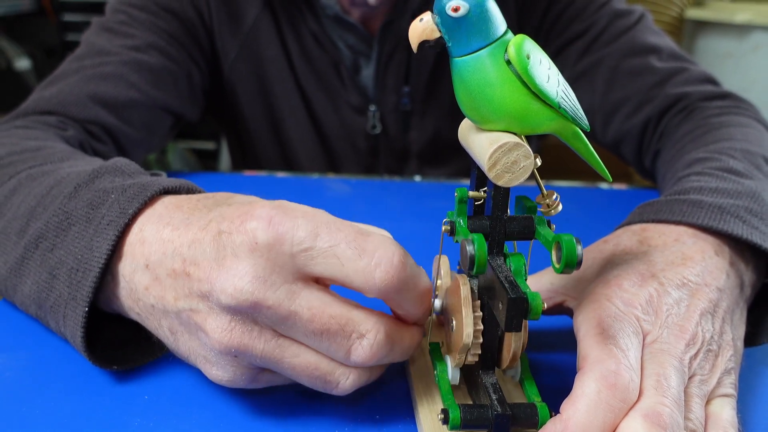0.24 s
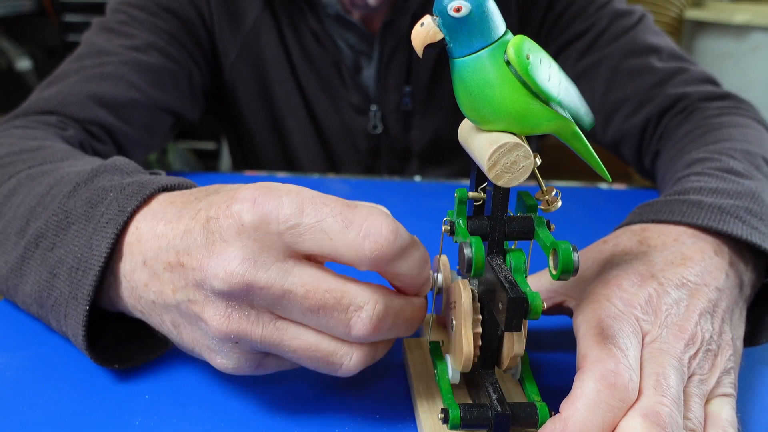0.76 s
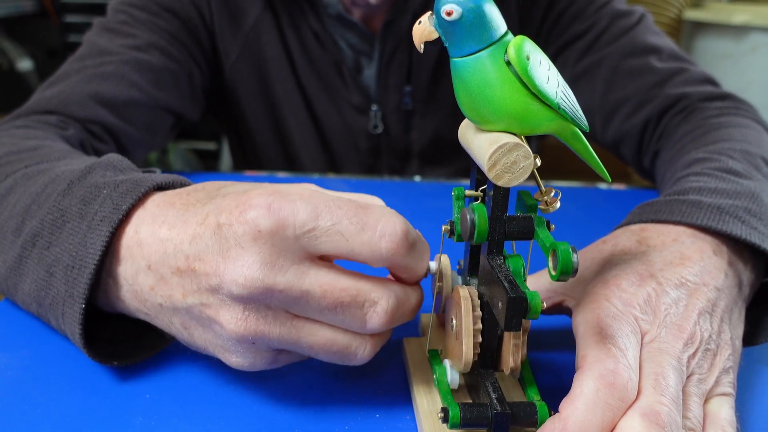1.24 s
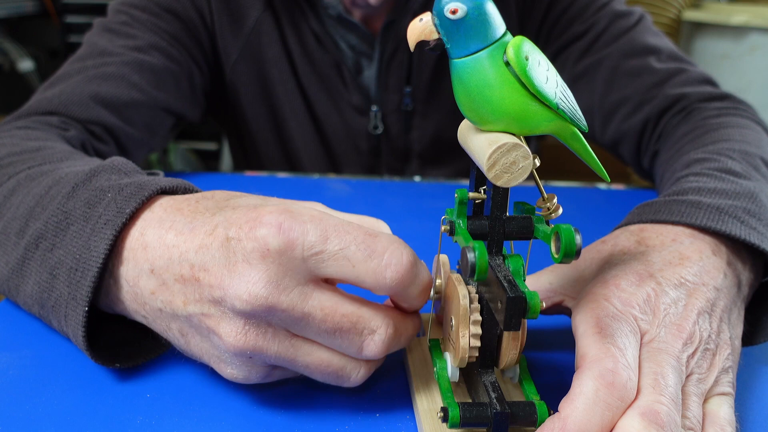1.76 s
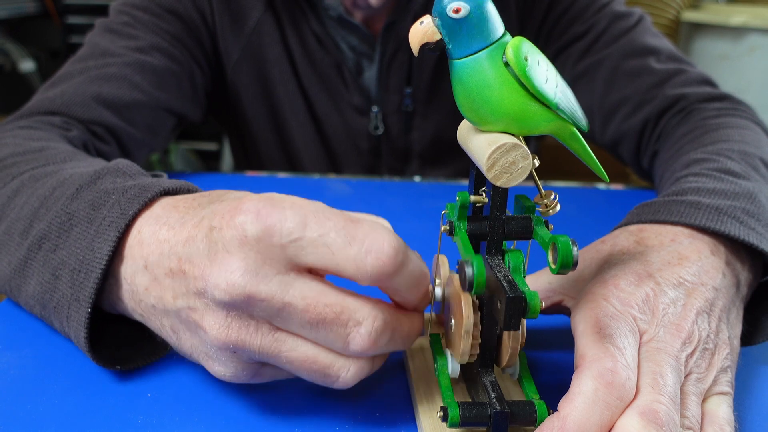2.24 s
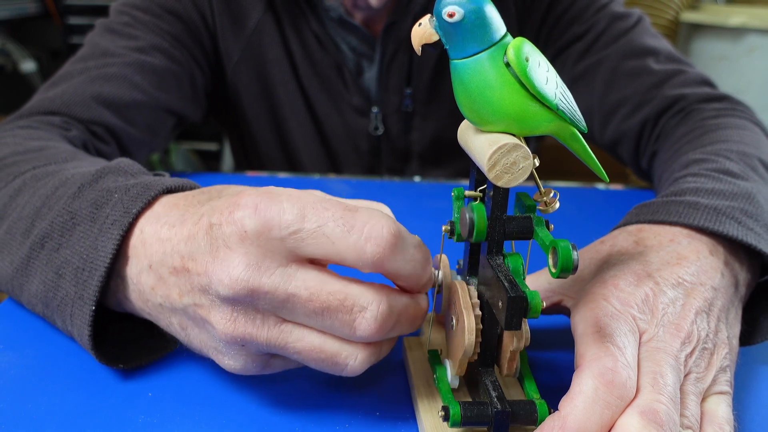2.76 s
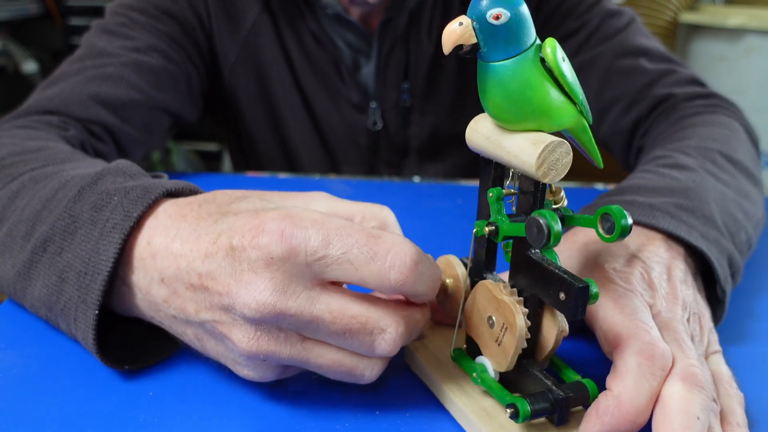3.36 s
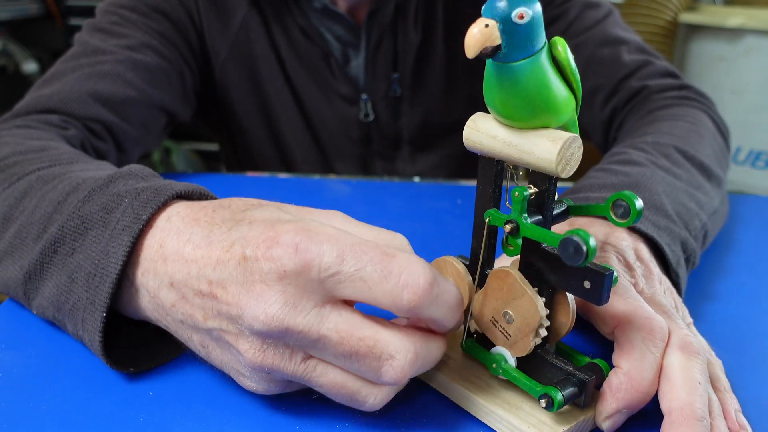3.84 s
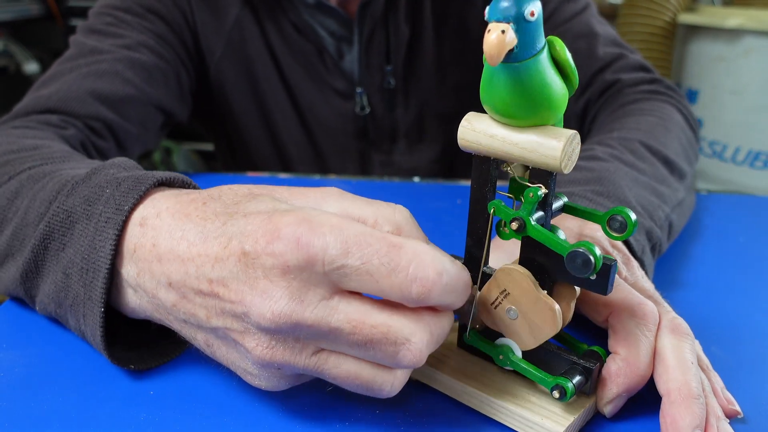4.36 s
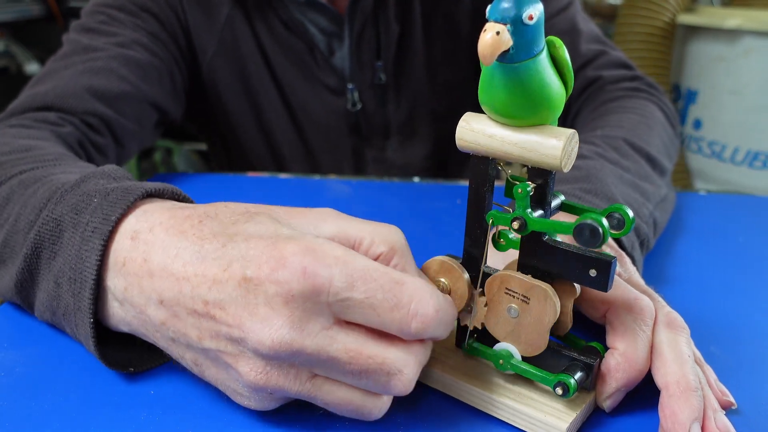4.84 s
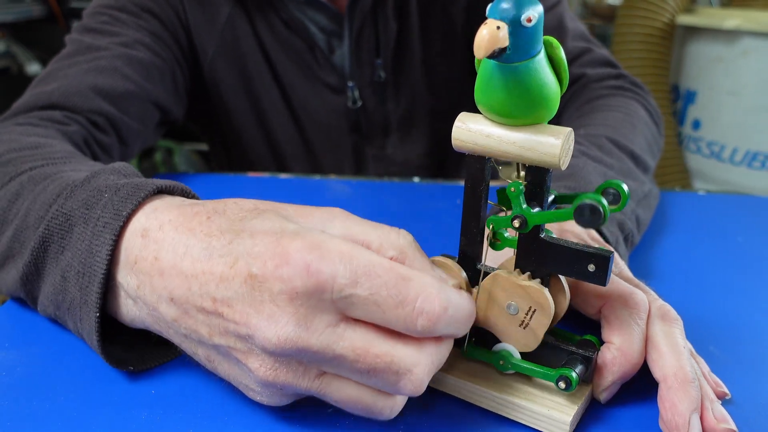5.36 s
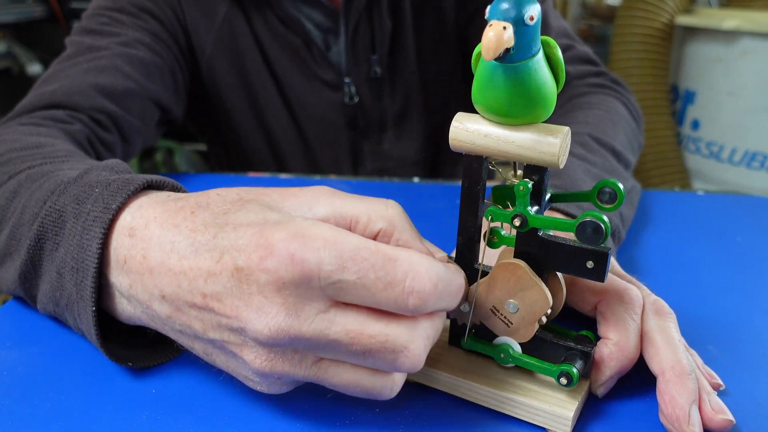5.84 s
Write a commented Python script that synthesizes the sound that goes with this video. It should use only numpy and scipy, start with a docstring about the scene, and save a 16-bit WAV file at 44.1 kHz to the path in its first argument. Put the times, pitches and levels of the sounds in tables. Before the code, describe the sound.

A small wooden mechanism is hand-cranked on a table, clicking, ticking and rubbing in uneven clusters, with two wooden knocks midway.

```python
"""A small wooden automaton clicks and rubs as a hand cranks it on a table, close to one microphone.
Gear teeth, cam followers, levers and wire links click: short bursts of force ring the modes of each part.
Between clicks they rub in tiny slips, which shake the base board and the table top; links and wires rustle.
The board bumps softly, twice it knocks down on the table as fading tones, and thin steel rods sing on.
A workshop room answers, over a steady low rumble with faint hiss and a dull wash made of filtered noise."""
import sys
import numpy as np
from scipy import signal
from scipy.fft import rfft, irfft, next_fast_len
from scipy.io import wavfile
from scipy.ndimage import uniform_filter1d, map_coordinates

SR = 44100
rng = np.random.default_rng(int(sys.argv[2]) if len(sys.argv) > 2 else 0)


def wav_record(signal):
    """Record a signal, one row per channel, as 16-bit PCM in the file named by sys.argv[1]."""
    frames = np.transpose(np.atleast_2d(signal))
    bounded = np.clip(frames, -1, 1)
    # unit amplitude maps onto the largest positive 16-bit level
    quanta = np.round(bounded * 32767).astype(np.int16)
    wavfile.write(sys.argv[1], SR, quanta)


N = 268657  # length in samples


def amp(db):
    """Turn dB into a plain factor."""
    return 10 ** (np.asarray(db) / 20)


def unit(x):
    """Scale a sound to an rms of 1."""
    return x / np.sqrt(np.mean(x ** 2) + 1e-20)


def along(points, hz):
    """Read a curve of (Hz, value) points on a log frequency axis."""
    f, value = np.transpose(points)
    return np.interp(np.log(hz + 1), np.log(f + 1), value)


def over_time(points):
    """Read a curve of (seconds, value) points at every sample."""
    return np.interp(np.arange(N) / SR, *np.transpose(points))


def wobble(rate):
    """Draw a smooth random curve with this many knots a second."""
    knots = rng.standard_normal(int(N * rate / SR) + 4)
    return map_coordinates(knots, [np.arange(N) * rate / SR])


def filtered(x, response):
    """Multiply the spectrum of x by a response of frequency."""
    size = next_fast_len(N + SR // 2)
    spectrum = rfft(x, size) * response(np.fft.rfftfreq(size, 1 / SR))
    return irfft(spectrum, size)[..., :N]


def modes(rows, f):
    """Give one causal resonance per row (centre Hz, width Hz, dB), with alternating signs."""
    return np.array([(-1) ** k * amp(db) * 1j * f * width / (centre * centre - f * f + 1j * f * width)
                     for k, (centre, width, db) in enumerate(rows)])


def span(rows, f):
    """A part radiates little far below or above its modes."""
    low, high = 0.83 * rows[0][0], 1.172 * rows[-1][0]
    return modes([(np.sqrt(low * high), high - low, 0)], f)[0] ** 2


def body(rows, f, struck):
    """The ring of a part whose modes are struck with the given strengths."""
    return span(rows, f) * (struck @ modes(rows, f))


def rubbed(rows, per_second, spread_db, smooth, damping=1):
    """Tiny unequal slips over an even scrape ring a part; lasting contact damps and widens its modes; rms 1."""
    size_db = spread_db * np.minimum(rng.exponential(size=N), 4)
    slips = (rng.random(N) < per_second / SR) * amp(size_db) * rng.standard_normal(N)
    damped = np.array(rows) * [1, damping, 1]
    colour = lambda f: span(rows, f) * np.linalg.norm(modes(damped, f), axis=0)
    return unit(filtered(unit(slips) + smooth * rng.standard_normal(N), colour))


# The clearest contacts. Each row: time of the peak in seconds, wood level in dB, strongest wood ring in Hz,
# steel level in dB, strongest steel ring in Hz, wires level in dB. Levels are before sharing and scatter.
CONTACTS = [(0.0726, -41, 4290, -38, 9910, -38), (0.084, -35, 3790, -33, 9390, -45),
            (0.088, -34, 4050, -26, 8000, -32), (0.1137, -42, 3600, -41, 7900, -29),
            (0.1249, -28, 4170, -45, 8250, -53), (0.144, -24.5, 4970, -32, 6250, -47),
            (0.257, -35, 4220, -44, 7620, -62), (0.276, -44, 4330, -25.5, 7900, -42),
            (0.2858, -25.5, 4200, -43, 6870, -57), (0.2934, -37, 4120, -40, 10550, -39),
            (0.321, -24, 4100, -36.5, 6760, -47), (0.3306, -31.5, 3770, -32.5, 8350, -46),
            (0.407, -28, 3000, -43, 9320, -42), (0.452, -21.5, 2730, -30, 7960, -44),
            (0.4562, -26.5, 2840, -34, 7880, -44), (0.5087, -41, 2390, -39, 9500, -22),
            (0.513, -20, 5000, -24, 9000, -39), (0.5155, -24, 5060, -16, 6600, -46),
            (0.5363, -12.5, 2740, -8.5, 7060, -20), (0.5436, -22, 5080, -35, 6930, -37),
            (0.555, -24, 5920, -25, 6070, -47), (0.5585, -12, 5170, -10.5, 8600, -32.5),
            (0.5715, -39, 1230, -28, 8510, -45), (0.613, -40, 5190, -39, 7690, -63),
            (0.7219, -27.5, 3750, -26.5, 8440, -30.5), (0.757, -31.5, 3060, -47, 8380, -52),
            (0.7624, -35, 4610, -50, 8100, -54), (0.7921, -27.5, 4110, -36, 6570, -27.5),
            (0.807, -46, 4240, -41, 9800, -32), (0.8605, -35, 4440, -37, 8290, -50),
            (0.8854, -28.5, 4220, -32, 8570, -51), (0.903, -10.5, 3085, -9.5, 7300, -19),
            (0.935, -25.5, 3960, -26.5, 8200, -28), (0.9783, -16, 5040, -16.5, 7580, -38),
            (1.007, -25, 4020, -21, 6500, -50), (1.1169, -43, 4110, -43, 8400, -63),
            (1.132, -38.5, 4100, -52, 7820, -60), (1.142, -39.5, 2500, -38, 9320, -30),
            (1.177, -32, 3850, -37, 6870, -46), (1.18, -34, 1330, -32, 9300, -34),
            (1.2097, -30.5, 4260, -49, 7690, -64), (1.2293, -41, 2700, -40, 8700, -55),
            (1.2677, -32.5, 4130, -55, 8330, -71), (1.319, -38.5, 4110, -40, 6220, -65),
            (1.3814, -37.5, 5120, -51, 6100, -44), (1.399, -36, 4440, -38, 9410, -35),
            (1.422, -33, 4070, -41, 6070, -38), (1.4365, -45, 4030, -38, 9800, -32),
            (1.456, -30, 2350, -39, 9750, -21), (1.46, -35, 4220, -29, 9930, -23),
            (1.4642, -20.5, 4230, -23.5, 6500, -26), (1.491, -29, 4770, -32, 9350, -24.5),
            (1.522, -42, 4180, -40, 9020, -42), (1.536, -38, 4310, -52, 8310, -47),
            (1.7905, -37, 3940, -53, 6630, -52), (1.824, -36.5, 3570, -51, 9390, -51),
            (1.8542, -35.5, 4050, -41, 8250, -50), (1.9129, -33, 5200, -58, 7580, -63),
            (1.9455, -36, 1290, -52, 6780, -57), (1.95, -34.5, 2500, -38, 8180, -39),
            (2.121, -45, 4160, -43, 7770, -40), (2.1646, -25.5, 3740, -24, 10290, -31),
            (2.2024, -14.5, 4560, -21, 8130, -25), (2.2442, -22.5, 3120, -34, 8200, -38),
            (2.259, -25, 2800, -49, 8140, -51), (2.2652, -29, 2940, -49, 7820, -60),
            (2.345, -37, 1490, -38.5, 9350, -29), (2.3548, -25.5, 3100, -41, 7060, -51),
            (2.358, -20, 3900, -21, 6720, -46), (2.38, -13.5, 3200, -9.5, 7250, -20),
            (2.407, -16.5, 3750, -13, 8400, -12.5), (2.4173, -32, 3680, -14, 8600, -32),
            (2.4292, -47, 3380, -20, 8440, -42), (2.4975, -25, 3850, -31, 8360, -32),
            (2.5308, -26, 4870, -42, 7920, -43), (2.5519, -24, 4130, -39, 6980, -33.5),
            (2.5569, -25.5, 3090, -36, 8180, -49), (2.6047, -26, 2870, -52, 6040, -56),
            (2.627, -27, 4400, -24, 8250, -33), (2.6392, -21.5, 3950, -25, 8250, -33),
            (2.653, -10, 2920, -5.5, 7490, -16), (2.659, -20, 3830, -28, 6850, -41),
            (2.662, -13.5, 4200, -17, 9150, -36), (2.678, -22, 2650, -20, 7140, -27),
            (2.737, -21, 3980, -31, 6570, -58), (2.7697, -23, 4000, -28, 6780, -55),
            (2.8234, -22.5, 5200, -23, 10300, -28), (2.828, -32, 2950, -25.5, 8350, -33),
            (2.8558, -30, 3800, -35, 8810, -51), (2.957, -33, 4040, -54, 6910, -63),
            (2.99, -36, 3960, -41, 7840, -61), (3.0033, -31.5, 4220, -48, 8530, -66),
            (3.016, -26, 5380, -30, 8000, -35.5), (3.0427, -33.5, 4110, -51, 6740, -64),
            (3.15, -33.5, 2800, -36, 9990, -34), (3.1746, -34, 4890, -30, 6700, -42),
            (3.1799, -13.5, 5190, -23, 7670, -33), (3.213, -31.5, 1720, -45, 9860, -30),
            (3.27, -19, 4950, -27, 6700, -42), (3.356, -31, 1340, -45, 7430, -58),
            (3.5393, -47, 4310, -35, 8630, -57), (3.6151, -48, 3880, -36, 8530, -47),
            (3.6275, -32, 4200, -44, 8740, -52), (3.671, -39.5, 2690, -37.5, 8970, -54),
            (3.7458, -28.5, 4030, -38, 8310, -43), (3.802, -18, 4930, -29, 8160, -52),
            (3.932, -32, 4310, -26, 9060, -49), (3.937, -21.5, 4330, -47, 7210, -58),
            (3.9712, -32, 4240, -54, 7620, -62), (4.007, -29, 3930, -42, 9470, -36),
            (4.022, -24, 4250, -40, 9240, -52), (4.026, -31, 2390, -25, 8460, -47),
            (4.092, -19, 2970, -27, 8440, -35), (4.1375, -20.5, 2730, -21, 9350, -35),
            (4.154, -25.5, 2650, -27, 9990, -48), (4.2334, -14.5, 2675, -26, 7320, -45),
            (4.2368, -24, 2520, -26, 7100, -53), (4.27, -22, 2280, -26, 7750, -32),
            (4.2742, -21, 2890, -29, 8510, -47), (4.2897, -20, 2750, -21, 8300, -29),
            (4.3131, -19, 4590, -18, 7940, -42), (4.3178, -19, 3750, -30, 8290, -46),
            (4.3225, -18.5, 4310, -22, 7860, -40), (4.33, -26, 4160, -25, 6740, -52),
            (4.34, -29, 3940, -30.5, 7620, -47), (4.3466, -11, 3900, -23, 7080, -49),
            (4.412, -34, 1300, -34, 9240, -39), (4.4354, -26.5, 2630, -20.5, 9200, -32),
            (4.441, -25, 2840, -39, 8120, -46), (4.454, -26, 2760, -30.5, 9880, -42),
            (4.4997, -36, 4330, -49, 6980, -32.5), (4.8341, -22, 4260, -23.5, 8500, -36),
            (4.8522, -22, 2570, -29, 9000, -43), (4.857, -7.5, 4800, -6, 7300, -18),
            (4.864, -18, 5750, -35, 7730, -35), (4.8757, -24, 4220, -27, 6800, -33),
            (4.8857, -24, 2650, -31, 6910, -46), (4.923, -32, 4950, -36, 6680, -60),
            (4.9291, -11, 5030, -13, 6760, -37), (4.9518, -32, 4330, -38, 7040, -61),
            (4.9628, -27, 4160, -32, 7080, -57), (4.987, -27, 5430, -34, 7130, -49),
            (5.094, -33.5, 5300, -54, 6880, -54), (5.1027, -40.5, 1255, -34, 8750, -42),
            (5.1296, -35, 4130, -52, 7350, -61), (5.2334, -30.5, 4030, -32.5, 6240, -62),
            (5.2712, -32, 4600, -37, 8720, -32), (5.2756, -36, 2260, -31, 10080, -30),
            (5.3138, -21, 4310, -22, 6980, -27), (5.3364, -32, 4260, -26, 9990, -30.5),
            (5.361, -15.5, 4180, -25, 7190, -32), (5.3786, -31, 5710, -35, 10190, -28),
            (5.417, -33, 3770, -34, 8230, -42), (5.5077, -26.5, 5760, -25.5, 8520, -39),
            (5.512, -32, 4300, -47, 9020, -48), (5.5145, -30, 4440, -44, 8040, -58),
            (5.619, -31, 3570, -38, 6800, -52), (5.6653, -23, 4280, -32, 7580, -58),
            (5.7065, -29.5, 4180, -35.5, 9990, -34), (5.75, -27.5, 4330, -33, 7950, -40),
            (5.755, -14, 4200, -16.5, 7150, -43), (5.761, -40, 4500, -31, 10420, -25),
            (5.767, -26, 3920, -28, 6960, -41), (5.7717, -26, 4350, -32.5, 6070, -46),
            (5.8565, -31, 4900, -40, 6960, -63), (5.8815, -28, 4370, -36, 9040, -50),
            (5.8902, -21.5, 4350, -22, 6980, -51), (5.919, -40, 4290, -43, 7840, -58),
            (5.965, -31, 3760, -46, 8270, -46), (5.9846, -21.5, 4000, -30, 6980, -55),
            (5.988, -30, 4330, -30.5, 7900, -38), (6.0419, -8, 5350, -30, 7300, -16.5),
            (6.073, -25, 3010, -50, 10720, -47), (6.0784, -23.5, 2560, -19.5, 10000, -37)]
# The rings of board, levers, cams, pin, links and wires, one list for each part.
# Each row: frequency in Hz, width in Hz before damping, relative level in dB.
PART_MODES = [
    [(797, 610, 0.5), (1353, 200, 3), (1959, 280, 7.5)],
    [(2233, 410, -4), (2586, 450, 1.5), (2858, 450, 3), (3218, 360, -1.5)],
    [(3775, 450, -2.5), (4126, 450, 0), (5036, 230, -3), (5510, 550, -8)],
    [(6570, 600, -7), (7130, 320, -1.5)],
    [(7797, 350, 2), (8605, 420, 1.5), (9150, 660, -0.5), (10150, 810, -2)],
    [(11400, 990, -6), (12870, 830, -28), (13130, 1700, 2), (14230, 450, 2.5), (15740, 880, 6)],
]
# The frequencies in Hz that divide board, levers, cams, pin and links.
PART_BORDERS_HZ = [2150, 3500, 6000, 7500]
# How a blow on wood is shared. One row for each struck part, board, lever or cam;
# the columns are the dB that board, levers and cams each get.
WOOD_SHARES_DB = [(4, -0.5, -7.5), (-5.5, 1, -6.5), (-8, -7, 1.5)]
# The same for steel: one row for each struck part, pin or link; the columns are the dB for pin and links.
STEEL_SHARES_DB = [(1, -10.5), (-11, 0.5)]
# How many times wider the touching parts make each other's modes (a factor): board, levers, cams, pin, links, wires.
TOUCH_DAMPING = [1.1, 1.3, 1.5, 1.01, 1.2, 1.01]
CONTACT_MS, CONTACT_SCATTER = 1.6, 0.2365  # typical contact length, and its random spread (log scale)
SHARE_SCATTER_DB = 1
BOARD_LAGS, USUAL_DB = 0.27, -26.5  # the board loses this many dB per dB of blow over the usual


def clicks():
    """Each contact is a short rattle of force; the struck parts hand the blow on to their neighbours."""
    s, wood, wood_hz, steel, steel_hz, wires = np.vstack([CONTACTS, ticks()]).T
    count, size = len(s), 1024
    t, f = np.arange(size) / SR, np.fft.rfftfreq(size, 1 / SR)

    # noise that swells and fades within the contact
    length_s = CONTACT_MS / 1000 * np.exp(CONTACT_SCATTER * rng.standard_normal((count, 1)))
    u = 3.2 * t / np.clip(length_s, 3e-4, 0.005)
    force = rfft(u ** 1.6 * np.exp(-u) * rng.standard_normal((count, size)))

    struck_wood = np.searchsorted(PART_BORDERS_HZ[:2], wood_hz)
    wooden = wood[:, None] + np.array(WOOD_SHARES_DB)[struck_wood]
    wooden -= BOARD_LAGS * np.outer(wood - USUAL_DB, [1, 0, 0])
    struck_steel = np.searchsorted(PART_BORDERS_HZ[-1:], steel_hz)
    steely = steel[:, None] + np.array(STEEL_SHARES_DB)[struck_steel]
    levels = np.c_[wooden, steely, wires]
    levels = levels + SHARE_SCATTER_DB * rng.standard_normal((count, len(PART_MODES)))

    sound = np.zeros((count, size))
    for part, damping, db in zip(PART_MODES, TOUCH_DAMPING, levels.T):
        # each blow lands at another spot and favours the modes next to its strongest rings
        mode_hz = np.array(part)[:, 0]
        near = sum(np.exp(-(np.log(mode_hz / hz[:, None]) / 0.076) ** 2) for hz in (wood_hz, steel_hz))
        struck = amp(2.5 * rng.standard_normal((count, len(part))) + 6.3 * near)
        ring = irfft(force * body(np.array(part) * [1, damping, 1], f, struck), size)
        sound += amp(db)[:, None] * ring / np.abs(ring).max(axis=1, keepdims=True)

    # put the loudest millisecond of each click at its listed time
    peak = uniform_filter1d(sound ** 2, size=44).argmax(axis=1)
    where = (np.round(s * SR).astype(int) - peak)[:, None] + np.arange(size)
    return np.bincount(np.maximum(where, 0).ravel(), sound.ravel(), N + size)[:N]


TICKS_PER_S = 10
TICK_DB, TICK_SCATTER_DB = 9, 2  # wood level over the gears' scrape, and its spread
TICK_STEEL_DB, TICK_WIRES_DB = -8.5, -14  # relative to the tick's wood level


def ticks():
    """Small chance contacts, laid out like CONTACTS, grow and shrink with the gears' scrape."""
    count = int(N / SR * 40)
    draw, known = rng.random((count, 3)), np.array(CONTACTS)
    s = 0.02 + draw[:, 0] * (N / SR - 0.05)
    scrape_db = np.interp(s, *np.transpose(CRANK_RUB)[::2])
    wood = scrape_db + TICK_DB + TICK_SCATTER_DB * rng.standard_normal(count)
    spot = known[(draw[:, 1] * len(known)).astype(int)]  # borrow the rings of a listed contact
    rows = np.c_[s, wood, spot[:, 2], wood + TICK_STEEL_DB, spot[:, 4], wood + TICK_WIRES_DB]
    return rows[draw[:, 2] < TICKS_PER_S * N / SR / count]


# Rubbing under the crank, before the random jolts.
# Each row: time in seconds, shaking of the board in dB, scrape of the gears in dB.
CRANK_RUB = [(0, -49, -53), (.1, -38, -42.5), (.22, -53.5, -60), (.29, -34.5, -40.5), (.39, -51.5, -47),
             (.46, -44.5, -47), (.52, -44.5, -38), (.56, -36, -40), (.66, -49.5, -50.5), (.98, -42, -41.5),
             (1.08, -58.5, -55.5), (1.15, -43, -46), (1.37, -56.5, -67), (1.46, -31.5, -32.5),
             (1.56, -54, -62.5), (1.66, -40.5, -43.5), (1.71, -59, -64), (1.8, -32, -43.5),
             (1.9, -45.5, -49), (1.95, -35, -47.5), (2.03, -59.5, -63.5), (2.19, -36, -39),
             (2.31, -45, -46.5), (2.41, -35, -33), (2.58, -44.5, -49), (2.68, -37.5, -39.5),
             (2.78, -42, -41), (2.98, -47, -55.5), (3.07, -43.5, -44), (3.14, -46, -44),
             (3.19, -35.5, -44.5), (3.335, -49, -44), (3.36, -37, -46), (3.48, -52, -54), (3.61, -38, -44),
             (3.86, -41.5, -46.5), (3.9, -56, -63), (3.95, -34, -42.5), (4.05, -44.5, -47.5),
             (4.24, -44.5, -43.5), (4.32, -32, -35), (4.57, -53.5, -59), (4.63, -42.5, -41.5),
             (4.67, -55, -77), (4.82, -51, -52), (4.865, -30, -29), (5.02, -49, -49), (5.26, -48, -45.5),
             (5.33, -35, -37.5), (5.46, -52, -51), (5.51, -34.5, -43), (5.59, -51.5, -51), (5.63, -39, -41),
             (5.68, -44, -45.5), (5.77, -37, -33), (5.83, -51, -51.5), (5.89, -39, -34), (6.09, -42, -55)]
# Arms and crank shake the table top. Each row: time in seconds, level in dB.
TABLE_LEAN = [(0, -47.5), (.56, -42.5), (.68, -54.5), (.9, -43), (1.61, -48), (1.93, -40), (2.17, -46.5),
              (2.53, -43), (2.59, -34), (3.07, -46), (3.14, -39), (3.26, -49), (3.335, -42), (3.355, -28.5),
              (3.46, -32), (3.53, -38), (3.81, -45), (4.36, -39), (4.56, -56), (4.82, -43), (4.94, -32.5),
              (5.31, -48), (5.5, -40.5), (5.6, -35), (6.09, -35.5)]
# The wires rub faintly. Each row: time in seconds, level in dB before the jolts.
WIRE_RUB = [(0, -64), (.25, -81), (1.3, -73), (1.7, -66), (2.6, -72.5), (2.98, -77), (3.35, -67),
            (3.9, -77), (4.2, -64), (4.75, -81), (5.1, -65), (6.09, -91)]
# How much of the gears' scrape, in dB, goes to board, levers, cams, pin and links.
SCRAPE_SHARES_DB = [-9.5, -11.5, -9.5, -21.5, -15]
# Modes of the table top. Each row: frequency in Hz, width in Hz, relative level in dB.
TABLE_MODES = [(30, 5.3, -0.5), (44.6, 9.4, 2.5), (95.5, 21, -10)]
# Low bending of the base board. Each row: frequency in Hz, width in Hz, relative level in dB.
BOARD_LOW_MODES = [(125.5, 29, -2), (144.4, 39, -3), (194, 126, 6)]
# Higher modes of the base board. Each row: frequency in Hz, width in Hz, relative level in dB.
BOARD_HIGH_MODES = [(238, 110, -5), (305.5, 13.7, 3.5), (339.5, 20, 4), (434, 36, -14), (535, 51, -7),
                    (610.4, 49, -3.5), (755, 28, -6)]
BENDING_DB = -48  # middle level of the low bending
BENDING_FOLLOWS, BENDING_LEANS = 0.38, 0.33  # dB per dB of shaking, and of leaning


def crank():
    """Teeth and cams scrape in uneven slips, each part in its own; the jolts reach the board and the scrape."""
    s, shake, gears = np.transpose(CRANK_RUB)
    shake_db, gears_db = [over_time(np.c_[s, level]) for level in (shake, gears)]
    lean_db = over_time(TABLE_LEAN)
    low_db = BENDING_DB + BENDING_FOLLOWS * (shake_db - shake_db.mean())
    low_db += BENDING_LEANS * (lean_db - lean_db.mean())
    jolt = wobble(35)

    table = amp(lean_db) * rubbed(TABLE_MODES, 40, 2.0, smooth=2.9)
    board = amp(low_db + 1.3 * jolt) * rubbed(BOARD_LOW_MODES, 220, 2.8, smooth=0.91)
    high_db = shake_db + 1.97 * jolt + 3.1 * wobble(90)
    board += amp(high_db) * rubbed(BOARD_HIGH_MODES, 400, 1.9, smooth=1.07)

    levels = [gears_db + share for share in SCRAPE_SHARES_DB] + [over_time(WIRE_RUB)]
    scrape = np.zeros(N)
    for db, part in zip(levels, PART_MODES):
        uneven_db = db + 4.26 * jolt + 2.3 * wobble(30) + 2.9 * wobble(90)
        scrape += amp(uneven_db) * rubbed(part, 500, 3.44, smooth=0.8, damping=2.0)
    return table + board, scrape


# Links and wires drag over each other in short rustles.
# Each row: start in seconds, length in seconds, links level in dB, wires level in dB, both before the stutter.
RUSTLE_TIMES = [(0.063, 0.099, -56.5, -55), (0.26, 0.079, -60, -62), (.49, .05, -65, -58),
                (0.785, 0.034, -72, -60), (1.145, 0.092, -68, -68), (1.381, 0.17, -58, -58),
                (1.777, 0.091, -63.5, -60), (2.12, .08, -56, -58), (2.326, .03, -55, -46),
                (2.55, .09, -69, -58), (3.134, 0.06, -51, -52), (3.605, 0.11, -51, -66),
                (3.697, 0.033, -54, -49), (3.828, 0.031, -57, -66), (3.937, 0.098, -53, -60),
                (4.21, 0.025, -51, -49), (4.49, 0.028, -63, -54), (5.257, .13, -55, -59),
                (5.692, 0.072, -53.5, -53), (5.886, .07, -61, -61)]
RUSTLE_IN_S, RUSTLE_OUT_S = 0.004, 0.0052  # fade in, and fade out after the length


def rustles():
    """Each drag of links and wires sets in quickly, stutters and lets go."""
    now, gain = np.arange(N) / SR, np.zeros((2, N))
    for s, length, *db in RUSTLE_TIMES:
        rise = (now - s) / RUSTLE_IN_S
        fall = (s + length - now) / RUSTLE_OUT_S + 1
        gain += np.outer(amp(db), np.clip(np.minimum(rise, fall), 0, 1))
    stutter = amp(3.5 * wobble(120))
    return stutter * sum(g * rubbed(part, 500, 3.8, smooth=0.67, damping=2.1)
                         for g, part in zip(gain, PART_MODES[-2:]))


# The board comes down on the table. Each row: start in seconds, level in dB,
# level of the low thud relative to that in dB, pitch factor of the crack.
BOARD_KNOCKS = [(3.0721, -16, -30, 0.74), (3.3456, -4.5, -6, 0.986)]
# The tones of the knocked table and board.
# Each row: frequency in Hz (before the pitch factor from 400 Hz up), relative level in dB, seconds to fade by 60 dB.
KNOCK_TONES = [(146, 1.5, 0.3), (238, -7, 0.36), (528, -7, 0.071), (870, -4.5, 0.047), (1340, -6, 0.023),
               (1500, 10, 0.012), (1850, 0, 0.019), (2160, -1, 0.024), (3020, -36, 0.014),
               (3750, -31, 0.014)]


def knocks():
    """The board's edge meets the table: a wooden crack, then the heavy top swings up and hums on."""
    out, t = np.zeros(N + SR), np.arange(SR) / SR
    for s, db, thud_db, pitch in BOARD_KNOCKS:
        for hz, level, t60 in KNOCK_TONES:
            if hz < 400:  # the heavy top needs time to swing up
                swing = amp(thud_db) * (1 - np.exp(-t / 0.0029))
                tone_hz = hz
            else:
                swing = 1
                tone_hz = hz * pitch
            fade = amp(db - 14 + level - 60 * t / t60)
            out[round(s * SR):][:SR] += fade * swing * np.sin(2 * np.pi * tone_hz * t)
    return out[:N]


# The board rocks and bumps softly on the table. Each row: middle of the push in seconds, peak level in dB.
SOFT_BUMPS = [(0.066, -34), (0.559, -28.5), (1.13, -34), (1.264, -35), (1.437, -38), (1.753, -38),
              (1.943, -29), (2.6, -30.5), (2.951, -46), (3.348, -24), (3.51, -31), (3.935, -26),
              (4.127, -33), (4.315, -40), (4.431, -38), (4.624, -30), (4.945, -31), (5.122, -30.5),
              (5.312, -35), (5.508, -31.5)]
BUMP_MS = 3.3  # length of the soft push


def bumps():
    """A soft push rings the board's bending modes."""
    t, out = np.arange(SR // 4) / SR, np.zeros(N + SR)
    push = np.exp(-((t - 0.01) / (BUMP_MS / 1000)) ** 2 * 8) * (t < 0.03)
    f = np.fft.rfftfreq(len(t), 1 / SR)
    for s, db in SOFT_BUMPS:
        struck = amp(2.6 * rng.standard_normal(len(BOARD_LOW_MODES)))
        ring = irfft(rfft(push) * body(BOARD_LOW_MODES, f, struck), len(t))
        out[round(s * SR):][:len(t)] += amp(db) * ring / np.abs(ring).max()
    return out[round(0.01 * SR):][:N]  # the push is centred 10 ms in


# Thin steel rods sing on after a touch.
# Each row: start in seconds, frequency in Hz, starting level in dB, seconds to fade by 60 dB.
ROD_PINGS = [(.292, 13151, -43, .18), (1.142, 11000, -69, 0.35), (2.407, 11100, -34, 0.14),
             (3.271, 7030, -50, 0.4), (5.378, 13250, -52, .2), (5.416, 13119, -52, 0.17),
             (5.775, 13140, -56, 0.19)]


def pings():
    """Each touched rod is a single thin tone that fades."""
    out, t = np.zeros(N + SR), np.arange(SR // 2) / SR
    for s, hz, db, t60 in ROD_PINGS:
        tone = np.sin(2 * np.pi * hz * t) * (1 - np.exp(-t / 0.001))
        out[round(s * SR):][:len(t)] += amp(db - 60 * t / t60) * tone
    return out[:N]


# The room's answer. Each row: frequency in Hz, seconds to fade by 60 dB, relative level in dB.
ROOM_FADE = [(200, 0.49, 2), (1940, 0.3, -1), (7000, 0.28, -4.5), (11100, 0.05, 4), (15000, 0.13, -1)]


def room(x):
    """Each frequency of the room's answer dies at its own speed; the tail differs as the parts move."""
    out, step, walls = np.zeros(N + SR), SR // 8, np.array(ROOM_FADE)
    for a in range(0, N, step):  # a fresh noise tail every eighth of a second
        hz, t, noise = signal.stft(rng.standard_normal(SR // 3), SR, nperseg=256)
        t60, db = along(walls[:, :2], hz)[:, None], along(walls[:, ::2], hz)[:, None]
        tail = signal.istft(noise * amp(db - 60 * t / t60), SR, nperseg=256)[1]
        wet = signal.fftconvolve(x[a:a + step], tail / np.linalg.norm(tail))
        out[a + 130:][:len(wet)] += wet  # 130 samples: about 3 ms late
    return out[:N]


# Colour of the steady rumble and hiss. Each row: frequency in Hz, relative level in dB per Hz.
HISS_COLOUR = [(35, -17), (60, 2.5), (139, -8), (244, -1.5), (1700, -37), (4420, -30), (6280, -30),
               (10500, -32), (16000, -53)]
# An even, dull wash swells in the background. Each row: time in seconds, level in dB.
WASH_LEVEL = [(0, -71), (2.1, -74), (2.9, -66.5), (3.5, -47.5), (4.7, -50), (5.2, -54), (6.09, -50.5)]
# Colour of the wash. Each row: frequency in Hz, relative level in dB per Hz.
WASH_COLOUR = [(300, -15), (700, 1), (2000, 1), (4500, -3), (6500, -11.5), (10000, -29), (16000, -24)]


def air():
    """Filtered noise makes the steady sound of room and microphone, and the wash that swells behind it."""
    def noise(colour):
        return unit(filtered(rng.standard_normal(N), lambda hz: amp(along(colour, hz))))
    return amp(-55.0) * noise(HISS_COLOUR) + amp(over_time(WASH_LEVEL)) * noise(WASH_COLOUR)


def scene():
    """Add all sources; the room answers clicks, knocks, scrape and rustles."""
    low, scrape = crank()
    hits = clicks() + knocks()
    scrape = scrape + rustles()
    answer = amp(-11) * room(hits + scrape)
    return (hits + bumps() + pings() + answer + low + scrape + air())[None]


TOP_HZ = 15850


def record(dry):
    """The recorder keeps almost nothing above its band limit."""
    return filtered(dry, lambda hz: 1 / (1 + (hz / TOP_HZ) ** 120))


dry = scene()
out = record(dry)
wav_record(out)
```